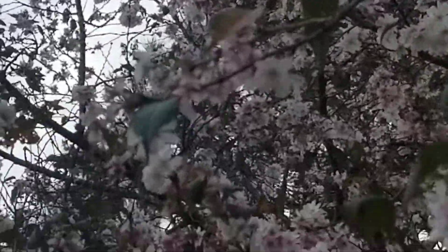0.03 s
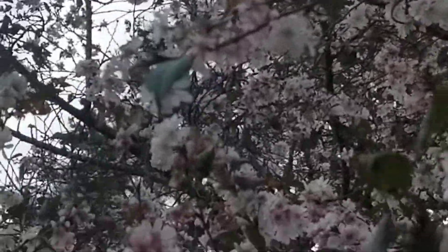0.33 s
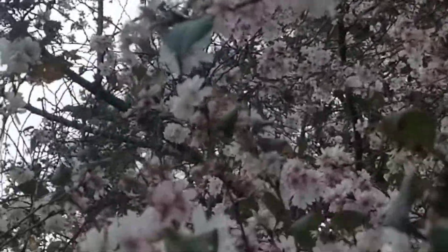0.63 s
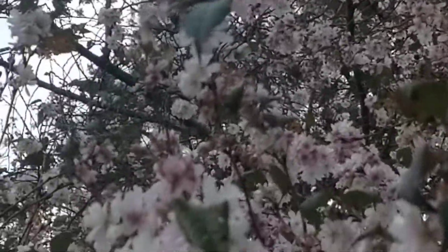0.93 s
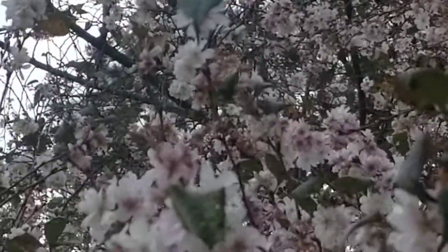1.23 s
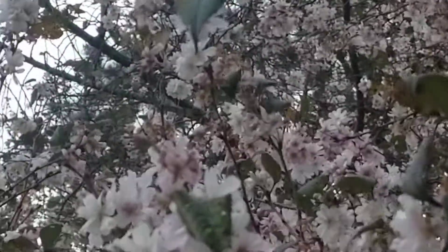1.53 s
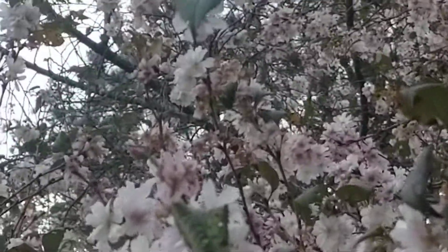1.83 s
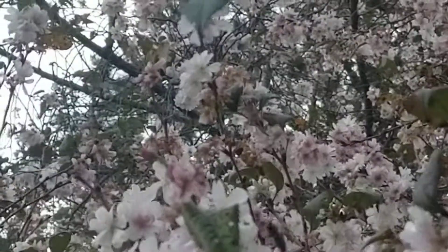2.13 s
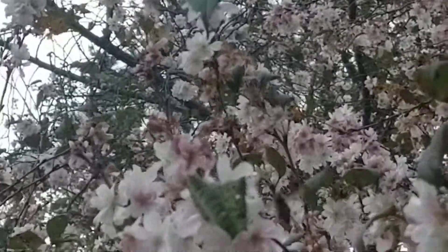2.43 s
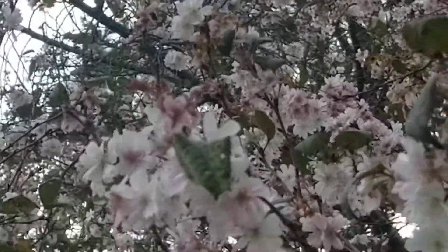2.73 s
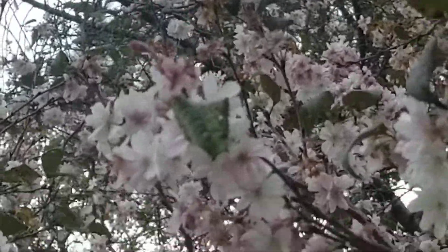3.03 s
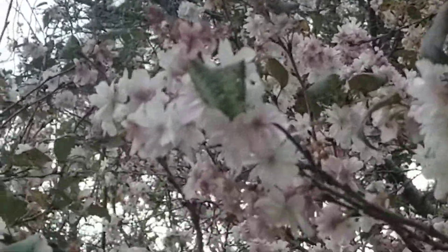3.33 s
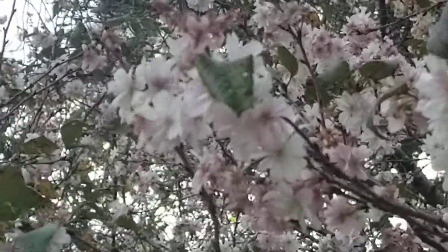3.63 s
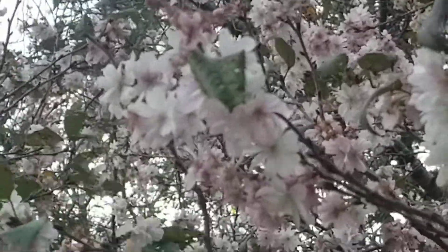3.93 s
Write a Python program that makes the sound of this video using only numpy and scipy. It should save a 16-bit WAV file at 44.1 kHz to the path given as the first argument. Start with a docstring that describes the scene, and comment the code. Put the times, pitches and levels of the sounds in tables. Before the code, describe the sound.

A steady far-off traffic rumble with soft wind on the microphone and faint distant birds.

```python
"""Under a tree in a garden. Light gusts buffet two microphone ports, mostly the right one:
their eddies are heard as low pressure fluctuations. Distant traffic rumbles as broadband noise,
a far engine drones in wavering tones and noise bands, and the microphones' self-noise hisses,
more on the left. Leaves brush together in faint puffs of clicks, and small far-off birds
whistle and chip in nearly pure tones, which the trees scatter into an echo."""
import sys
import numpy as np
from scipy import signal
from scipy.fft import rfft, irfft
from scipy.io import wavfile
from scipy.ndimage import uniform_filter1d

SR = 44100
rng = np.random.default_rng(int(sys.argv[2]) if len(sys.argv) > 2 else 0)


def persist_wave(psi):
    """Save psi, clipped to +-1, as 16-bit WAV."""
    counts = np.round(np.clip(psi, -1, 1) * 32767).astype(np.int16)
    wavfile.write(sys.argv[1], SR, np.atleast_2d(counts).T)


N = 176400

# Spectral shape of the buffeting: f/Hz, left relative level/dB, right relative level/dB
WIND_SPECTRUM = [(5, -47, -38), (19.7, -23, -24), (31, 0, -24), (44, -18, 1), (59.7, -14.5, 10), (87, 3, 3),
                 (118.3, -0.5, -6), (156.4, -14.5, -22), (221, -24.5, -26), (384, -46, -52),
                 (2000, -110, -110)]
# Gust envelope at the ports: t/s, left relative level/dB, right relative level/dB
GUSTS = [(0.0, -60, -31), (0.09, -44, -30.5), (0.2, -28, -21), (0.3, -41, -24.5), (0.47, -47, -30),
         (0.56, -38, -24), (0.63, -46, -37), (0.8, -51, -39), (0.93, -38, -37), (1.03, -32, -30),
         (1.15, -22, -19.5), (1.3, -38, -27), (1.46, -57, -28.5), (1.53, -61, -51), (1.58, -45, -26),
         (1.7, -36, -27.5), (1.8, -36, -21.5), (1.94, -40, -23.5), (1.99, -46, -34.5), (2.12, -41, -27.5),
         (2.26, -37, -30), (2.52, -35.5, -28.5), (2.62, -33.5, -22), (2.72, -40, -38), (2.95, -30.5, -26.5),
         (3.05, -34, -29.5), (3.16, -42, -21), (3.26, -44, -34), (3.35, -35, -33), (3.44, -29.5, -21),
         (3.6, -33, -26.5), (3.76, -39.5, -25.5), (3.87, -40, -32), (4.0, -33, -35)]
# Traffic spectrum before its swell: f/Hz, spectrum level/dB
TRAFFIC_SPECTRUM = [(20, -107), (50, -74.5), (95, -55.5), (140, -71), (188, -69), (212, -68), (250, -75),
                    (420, -79), (520, -81.5), (720, -81.5), (1000, -84.5), (1500, -89.5), (1950, -89.5),
                    (2500, -101), (3400, -105), (7000, -125)]
# Likeness of the traffic at the two ports: f/Hz, correlation (limited to -1..1 in use)
TRAFFIC_CORRELATION = [(60, 0.61), (210, 0.89), (370, 0.81), (520, 0.46), (800, -0.012), (1000, -0.22),
                       (1250, -0.48), (1800, -0.68), (2600, -0.043), (3400, -1.1)]
# Traffic swell, scaled down about its mean in use: t/s, relative level/dB
TRAFFIC_ENVELOPE = [(0.0, -56.5), (0.24, -51.5), (0.58, -58.5), (1.3, -54), (1.55, -52.5), (1.95, -52),
                    (2.15, -54.5), (3.0, -56), (3.6, -54), (4.0, -55.5)]
# Engine tones: f/Hz, rms pitch wander/Hz, level/dB, rms level wander/dB
ENGINE_TONES = [(105.63, 1.3, -39.5, 1.64), (198.9, 2.55, -46, 1), (379.2, 3.965, -54.5, 3)]
# Narrow bands of engine noise: centre f/Hz, bandwidth/Hz, level/dB
ENGINE_NOISE = [(141, 3.9, -52.5), (161.2, 11.7, -48.5), (176.6, 7.1, -52.5), (292.7, 31, -60),
                (315.9, 4.7, -60.5), (368.6, 19.3, -55.5), (461, 8, -69), (1083, 22, -70), (1987, 59, -68)]
# Swell of the whole engine: t/s, gain/dB
ENGINE_ENVELOPE = [(0, 2), (0.65, -0.5), (1.05, -0.8), (2.0, 0.15), (2.9, -0.3), (3.6, 1), (4, 1)]
# Microphone self-noise: f/Hz, left spectrum level/dB, right spectrum level/dB
HISS_SPECTRUM = [(1180, -105, -108), (2160, -93.5, -95), (2980, -90, -100.5), (3200, -84.5, -100.5),
                 (3820, -85, -100), (4250, -90, -103.5), (5100, -93.5, -103.5), (5300, -90.5, -103.5),
                 (6090, -92.5, -105), (6660, -100, -101), (6980, -97, -108), (7480, -92, -107),
                 (7880, -95.5, -105), (8740, -99.3, -112), (9700, -96, -115), (10900, -100.5, -109),
                 (12200, -99.5, -109), (13100, -93, -110.5), (14300, -96, -110.5), (15000, -99.5, -110.5),
                 (15800, -96, -111)]
# Slight rise of the hiss: t/s, gain/dB
HISS_ENVELOPE = [(0, -0.5), (1.2, -0.3), (2.2, 0.75), (4, 0.95)]
# Leaf contacts: centre t/s, level/dB
LEAF_CONTACTS = [(.32, -64), (.675, -65), (.74, -63), (1.78, -64), (3.3, -64), (3.76, -65)]
# Arched whistles: onset t/s, duration/s, top f/Hz, level/dB, left minus right/dB
BIRD_WHISTLES = [(.355, .195, 4950, -61, 10), (1.44, .19, 3730, -61.5, 0), (2.09, .2, 4720, -62.5, 8),
                 (3.78, .175, 4970, -61, 9)]
# Pitch contour of a whistle: fraction of duration, fraction of top frequency
WHISTLE_ARCH = [(0, .8), (.2, .89), (.38, .975), (.6, 1), (.78, .96), (1, .83)]
# Falling chips: onset t/s, duration/s, top f/Hz, fractional fall, level/dB, left minus right/dB
BIRD_CHIPS = [(.985, .055, 5300, .16, -62, 12), (2.678, .026, 5400, .24, -57.5, 13),
              (2.735, .035, 2650, .1, -64.5, 4), (2.8, .035, 3300, .1, -64, 4),
              (2.915, .035, 4300, .1, -65, 12)]


def from_db(db):
    """Amplitude ratio for a level in decibels."""
    return 10 ** (np.asarray(db) / 20)


def unit_rms(x):
    """The signal normalised to an rms of 1."""
    return x / np.sqrt(np.mean(x ** 2) + 1e-20)


def over_time(rows):
    """Each column of an envelope, interpolated to every sample."""
    times, *columns = np.transpose(rows)
    return np.array([np.interp(np.arange(N) / SR, times, c) for c in columns])


def over_frequency(rows):
    """Each column of a spectrum, interpolated in log frequency to every bin."""
    hz, *columns = np.transpose(rows)
    bin_hz = np.maximum(np.arange(N // 2 + 1) * SR / N, 1)
    return np.array([np.interp(np.log(bin_hz), np.log(hz), c) for c in columns])


def panned(pan_db):
    """Left and right gains for a level difference, left minus right."""
    return from_db(np.array([[.5], [-.5]]) * pan_db)


def drift(corner_hz):
    """Random modulation: low-pass noise with an rms of about 1."""
    step, settle = 40, 2000
    pole = np.exp(-2 * np.pi * corner_hz * step / SR)
    white = rng.standard_normal(N // step + settle + 2)
    slow = signal.lfilter([1], [1, -2 * pole, pole * pole], white)[settle:]
    return np.interp(np.arange(N) / step, np.arange(len(slow)), unit_rms(slow))


def shaped_spectra(rows):
    """Spectra of two uncorrelated noises with the given spectrum levels."""
    white = rfft(rng.standard_normal((2, N))) * np.sqrt(SR / 2)
    return white * from_db(over_frequency(rows))


def wind(eddy_s=0.021, evenness=0.84, split_hz=39, brightening=0.12, gain_db=-2.5):
    """Turbulent pressure: each port has its own eddies; a stronger gust is louder and brighter."""
    gust_db = over_time(GUSTS)
    eddies = irfft(shaped_spectra(WIND_SPECTRUM), N)
    power = eddies ** 2
    for _ in range(2):
        power = uniform_filter1d(power, int(eddy_s * SR), axis=1)
    # Evening out the short-term power makes the buffeting follow the gusts.
    eddies = unit_rms(eddies / (power + 1e-12) ** (evenness / 2))
    low = signal.sosfiltfilt(signal.butter(2, split_hz, fs=SR, output="sos"), eddies)
    upper_gain = from_db(brightening * (gust_db - gust_db.mean(axis=1, keepdims=True)))
    return from_db(gain_db + gust_db) * (low + upper_gain * (eddies - low))


def traffic(swell_share=0.42, flutter_db=1):
    """Partial coherence: a far, swelling wash, alike at both ports only at low frequencies."""
    mid, side = shaped_spectra(TRAFFIC_SPECTRUM)
    correlation = np.clip(over_frequency(TRAFFIC_CORRELATION), -1, 1)
    in_phase = np.sqrt((1 + correlation) / 2) * mid
    antiphase = np.sqrt((1 - correlation) / 2) * side * [[1], [-1]]
    swell_db = over_time(TRAFFIC_ENVELOPE)
    gain_db = swell_share * (swell_db - swell_db.mean()) + flutter_db * drift(19)
    return irfft(in_phase + antiphase, N) * from_db(gain_db)


def engine(wander_rate_hz=9.38, left_delay_s=0.0002):
    """Superposition: wavering tones and noise bands form a drone that reaches the left port later."""
    drone, t = np.zeros(N), np.arange(N) / SR
    for hz, wander_hz, level_db, wander_db in ENGINE_TONES:
        phase = 2 * np.pi * np.cumsum(hz + wander_hz * drift(wander_rate_hz)) / SR
        tone = np.sin(phase) * from_db(wander_db * drift(wander_rate_hz))
        drone += from_db(level_db) * unit_rms(tone)
    for hz, width_hz, level_db in ENGINE_NOISE:
        band = signal.butter(2, [hz - width_hz / 2, hz + width_hz / 2], "band", fs=SR, output="sos")
        noise = signal.sosfilt(band, rng.standard_normal(N + SR))[SR:]  # steady state only
        drone += from_db(level_db) * unit_rms(noise)
    left = np.interp(t - left_delay_s, t, drone)
    return from_db(over_time(ENGINE_ENVELOPE)) * np.array([left, drone])


def microphone_hiss(flicker_db=.3):
    """Self-noise: each microphone adds its own hiss, whose level flickers very slightly."""
    gain_db = over_time(HISS_ENVELOPE) + flicker_db * drift(14)
    return irfft(shaped_spectra(HISS_SPECTRUM), N) * from_db(gain_db)


def leaves(clicks_per_s=2500, band_hz=(3800, 6800), half_length_s=.016):
    """Contact noise: leaves brush each other in brief puffs of tiny random impulses."""
    t = np.arange(N) / SR
    clicks = rng.standard_normal((2, N)) * (rng.random((2, N)) < clicks_per_s / SR)
    band = signal.butter(2, band_hz, "band", fs=SR, output="sos")
    rustle = unit_rms(signal.sosfilt(band, clicks))
    envelope = sum(from_db(level_db) * np.exp(-((t - centre) / half_length_s) ** 2)
                   for centre, level_db in LEAF_CONTACTS)
    return panned(pan_db=12) * envelope * rustle


def bird_notes(rows, contour, waver_share=.016, flutter_db=2.2):
    """Frequency and amplitude modulation: each tone follows a pitch contour, swells and fades."""
    calls, t = np.zeros((2, N)), np.arange(N) / SR
    for start, length, top_hz, *shape, level_db, pan_db in rows:
        progress = np.clip((t - start) / length, 0, 1)
        hz = top_hz * contour(progress, *shape) * (1 + waver_share * drift(90))
        swell = np.sqrt(np.abs(np.sin(np.pi * progress ** 1.6)))  # loudest late in the note
        envelope = swell * from_db(level_db + flutter_db * drift(65))
        calls += panned(pan_db) * envelope * np.sin(2 * np.pi * np.cumsum(hz) / SR)
    return calls


def birds():
    """Frequency glides: whistles rise, hold and fall; chips hold briefly, then dive."""
    whistles = bird_notes(BIRD_WHISTLES, lambda u: np.interp(u, *np.transpose(WHISTLE_ARCH)))
    chips = bird_notes(BIRD_CHIPS, lambda u, fall: 1 - fall * u ** 2.5)
    return whistles + chips


def tree_echo(calls, t60_s=.7):
    """Scattering: trunks and leaves return dense echoes that decay exponentially."""
    t = np.arange(SR) / SR
    response = rng.standard_normal((2, SR)) * from_db(-60 * t / t60_s)
    response /= np.sqrt(np.sum(response ** 2, axis=1, keepdims=True))
    return panned(pan_db=4) * signal.fftconvolve(calls, response, axes=1)[:, :N]


def scene():
    """Linear superposition: all sources add in the two channels; only the birds have an echo."""
    background = wind() + traffic() + engine() + microphone_hiss() + leaves()
    calls = birds()
    return background + calls + tree_echo(calls)


def record(dry):
    """Band limiting: a steep low-pass filter removes the highest treble."""
    cutoff_hz = 15750
    return signal.sosfilt(signal.ellip(12, .1, 80, cutoff_hz, fs=SR, output="sos"), dry)


dry = scene()
out = record(dry)
persist_wave(out)
```